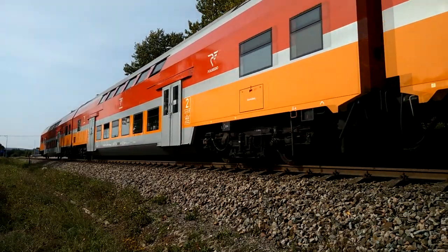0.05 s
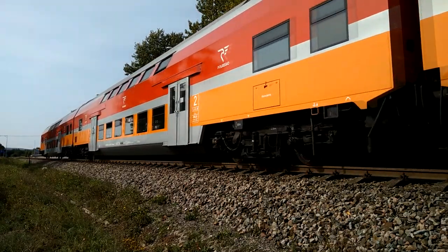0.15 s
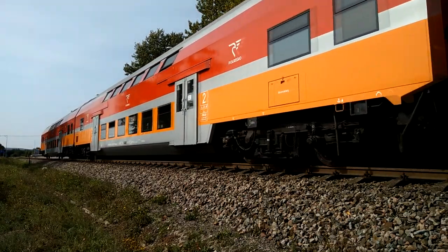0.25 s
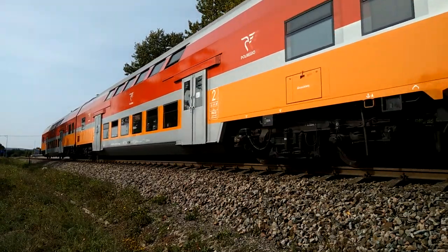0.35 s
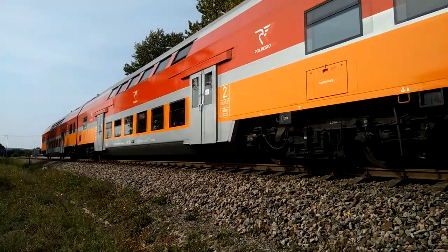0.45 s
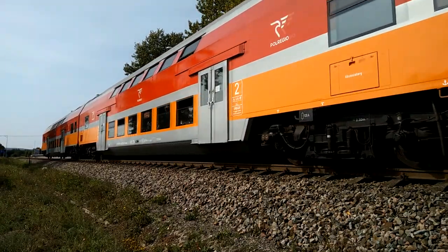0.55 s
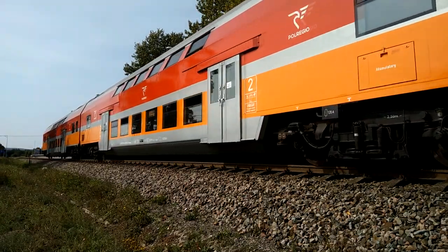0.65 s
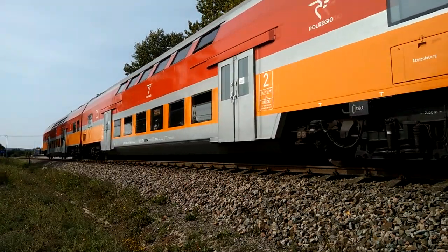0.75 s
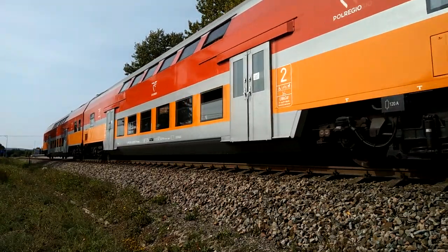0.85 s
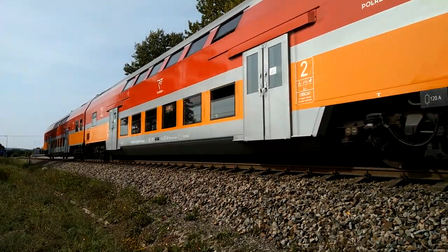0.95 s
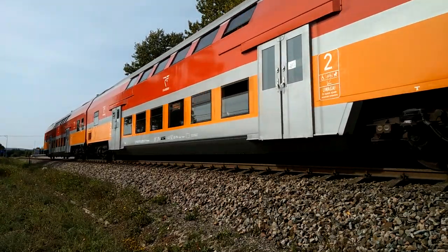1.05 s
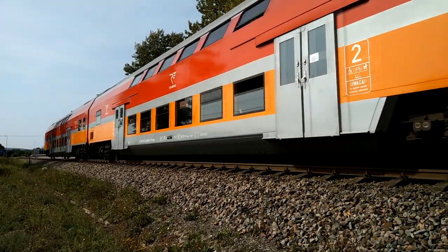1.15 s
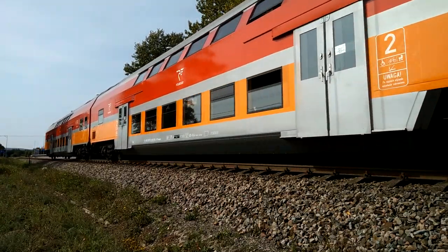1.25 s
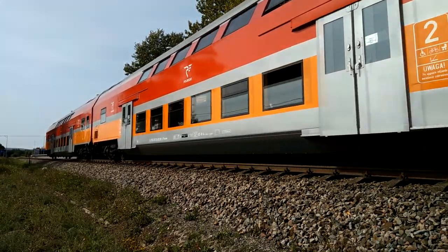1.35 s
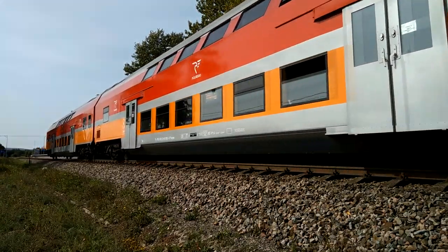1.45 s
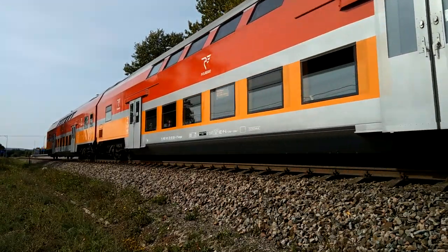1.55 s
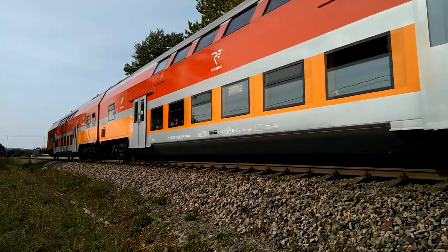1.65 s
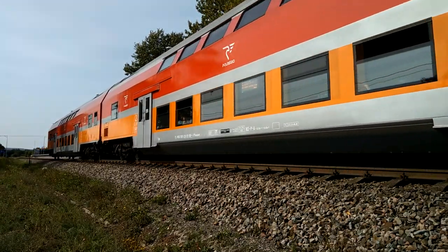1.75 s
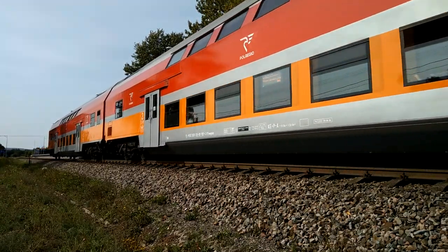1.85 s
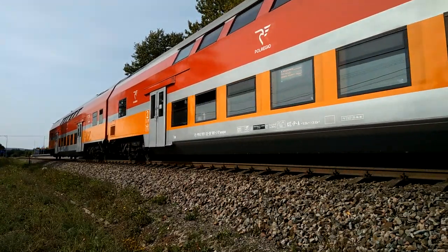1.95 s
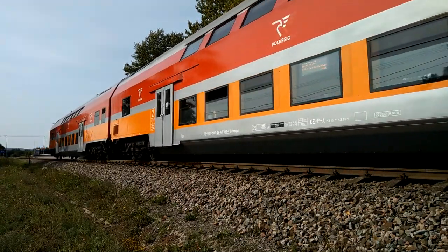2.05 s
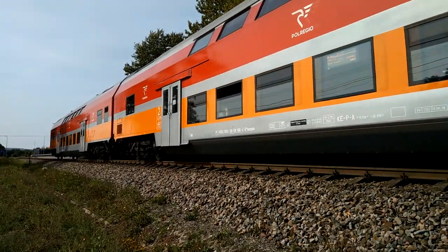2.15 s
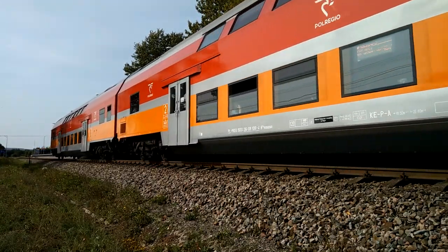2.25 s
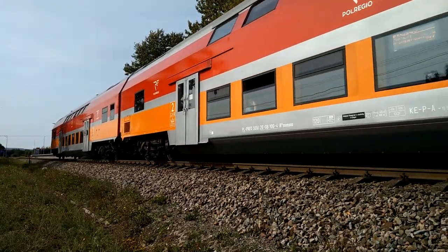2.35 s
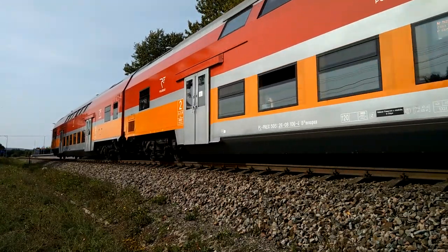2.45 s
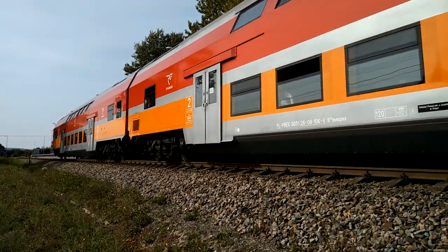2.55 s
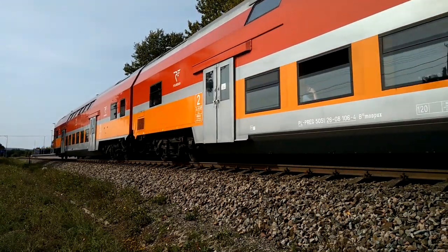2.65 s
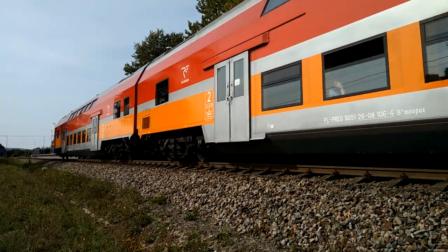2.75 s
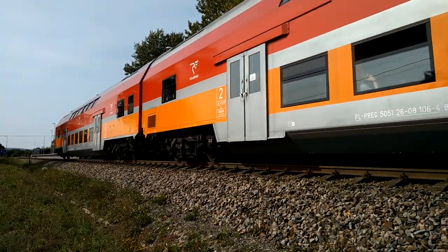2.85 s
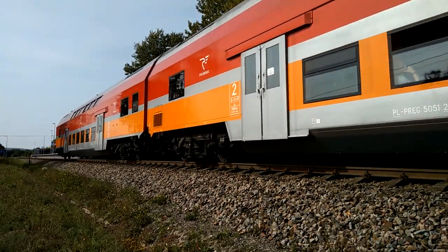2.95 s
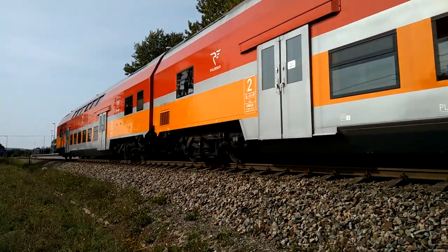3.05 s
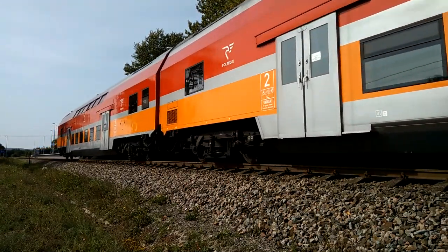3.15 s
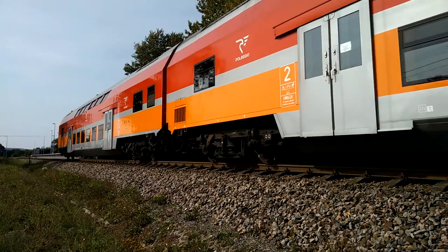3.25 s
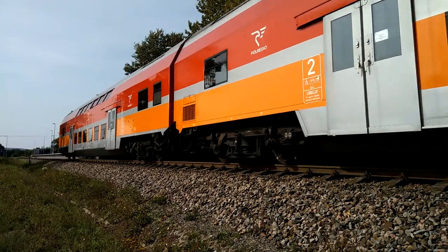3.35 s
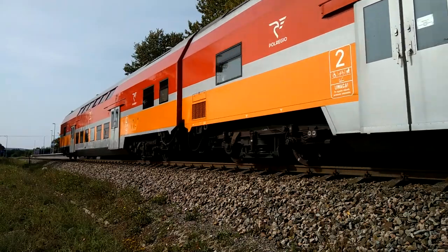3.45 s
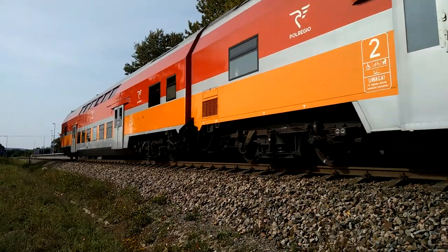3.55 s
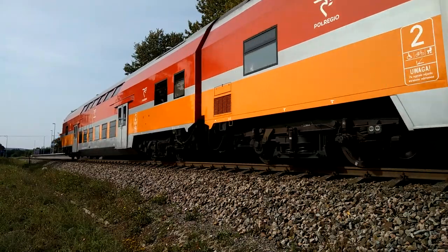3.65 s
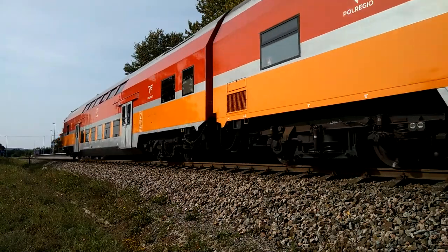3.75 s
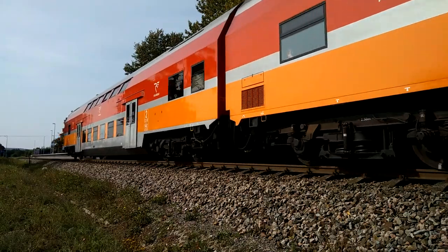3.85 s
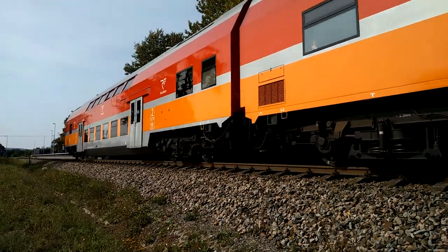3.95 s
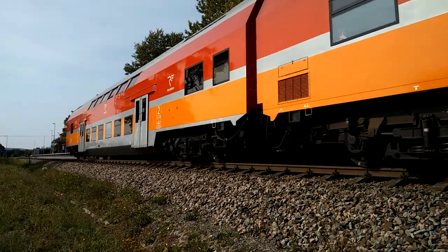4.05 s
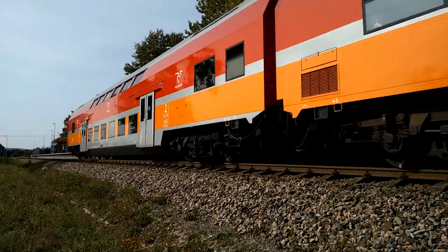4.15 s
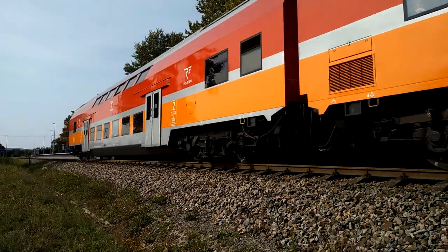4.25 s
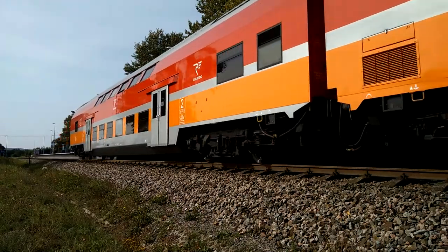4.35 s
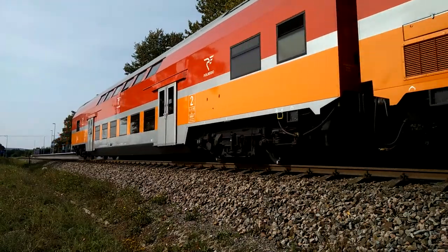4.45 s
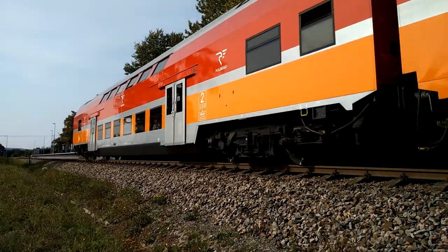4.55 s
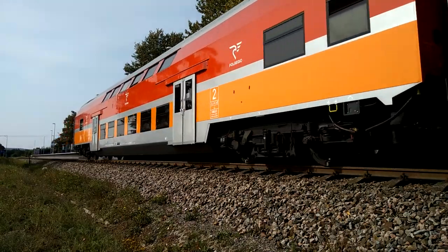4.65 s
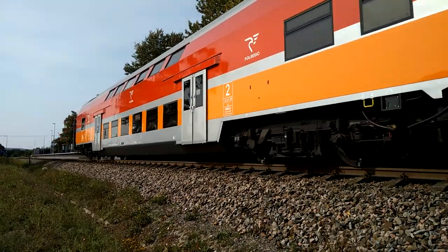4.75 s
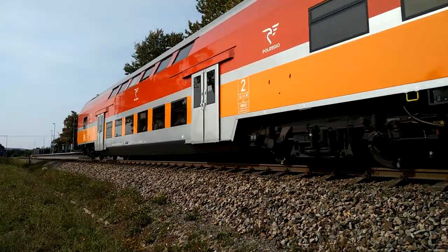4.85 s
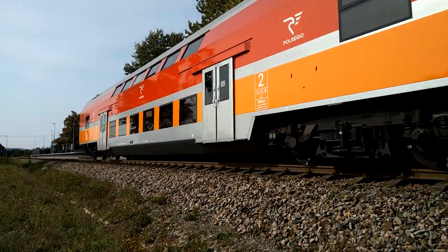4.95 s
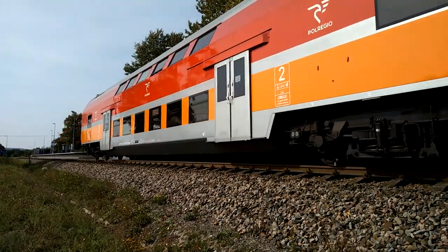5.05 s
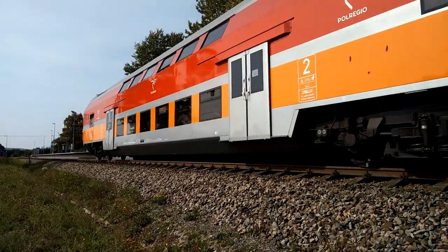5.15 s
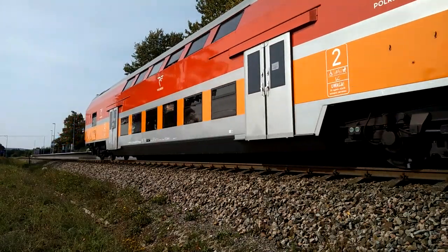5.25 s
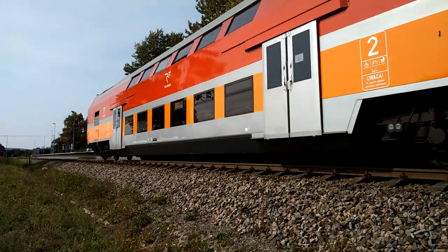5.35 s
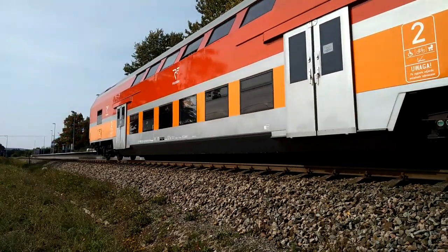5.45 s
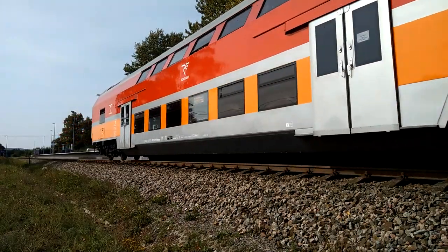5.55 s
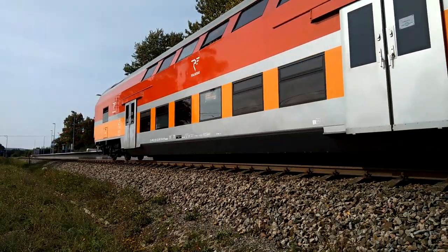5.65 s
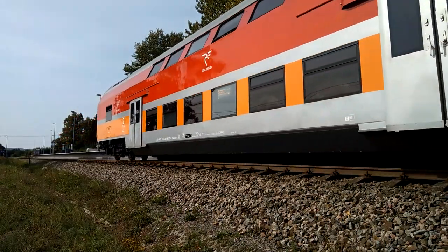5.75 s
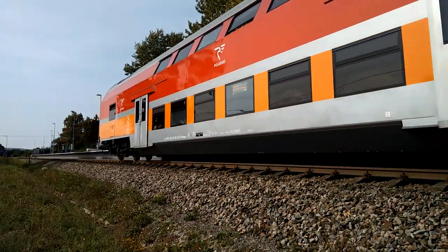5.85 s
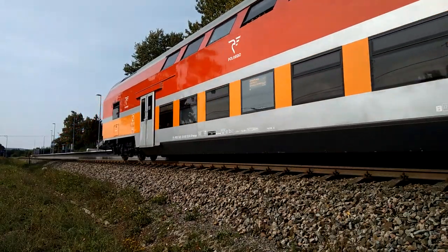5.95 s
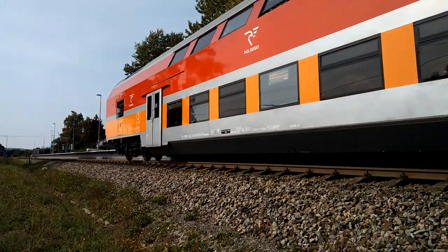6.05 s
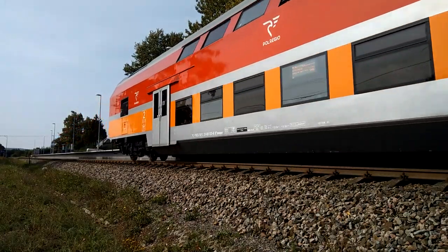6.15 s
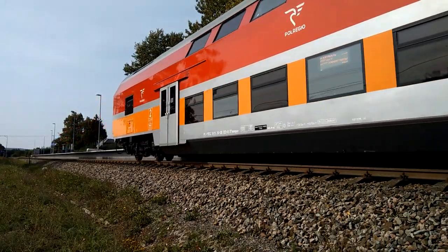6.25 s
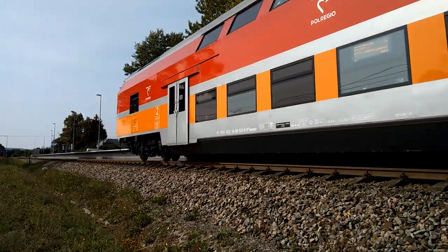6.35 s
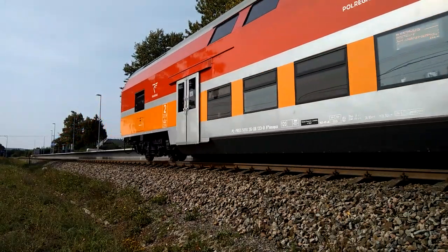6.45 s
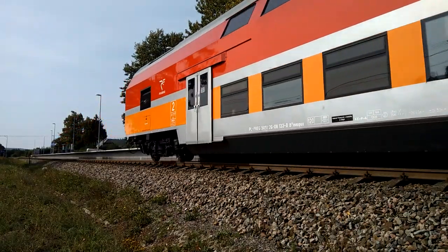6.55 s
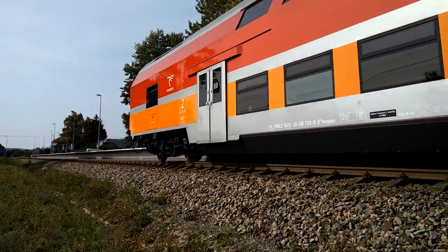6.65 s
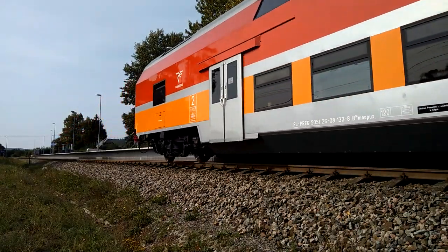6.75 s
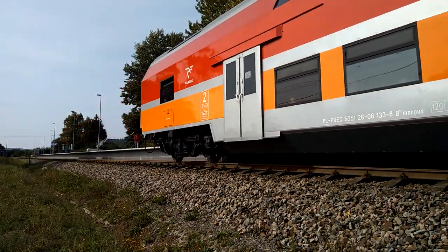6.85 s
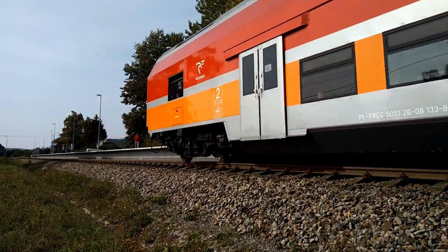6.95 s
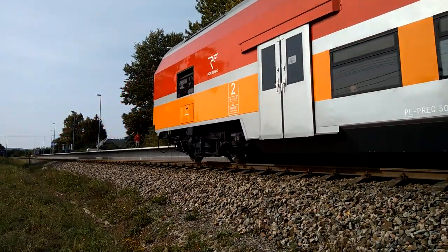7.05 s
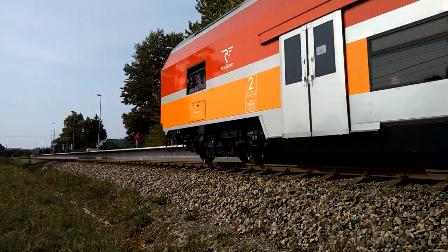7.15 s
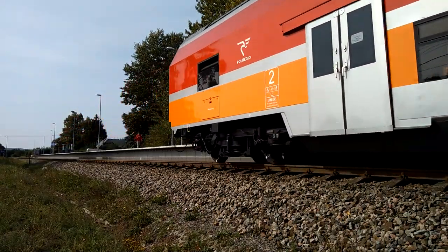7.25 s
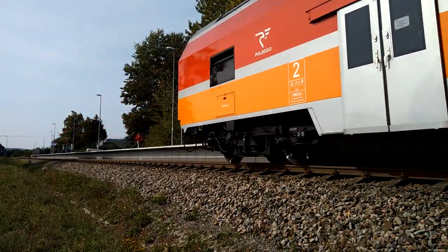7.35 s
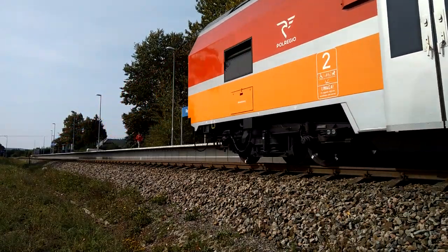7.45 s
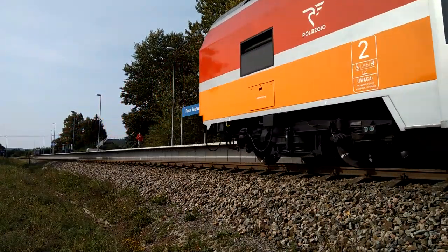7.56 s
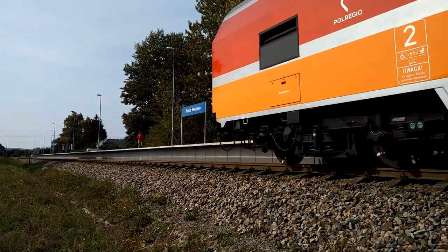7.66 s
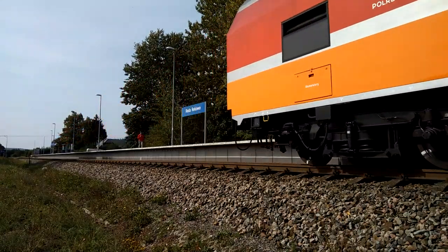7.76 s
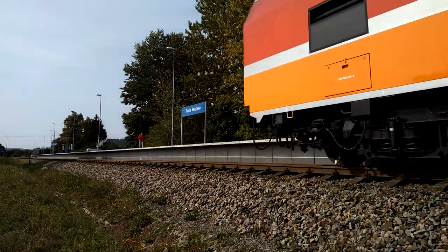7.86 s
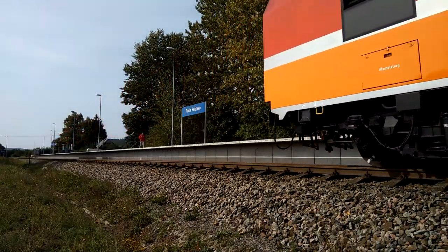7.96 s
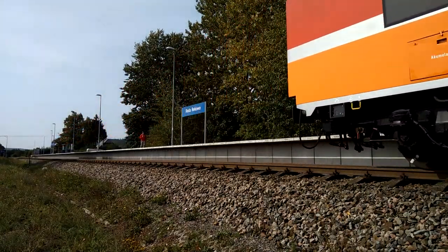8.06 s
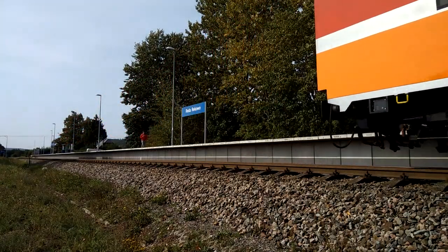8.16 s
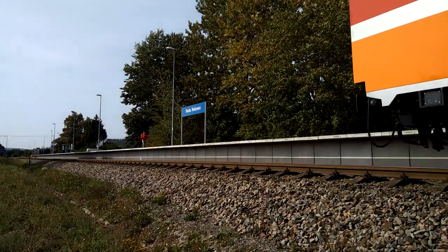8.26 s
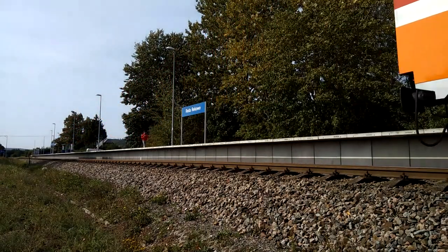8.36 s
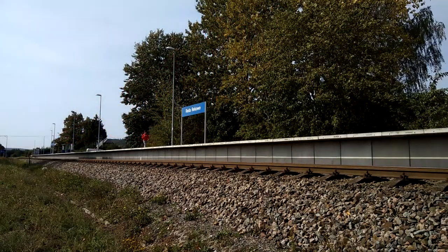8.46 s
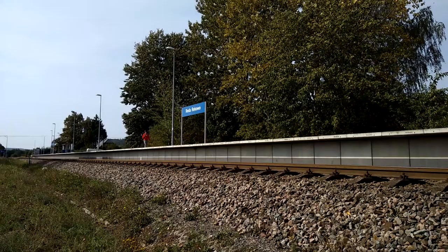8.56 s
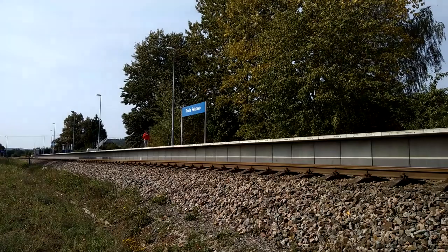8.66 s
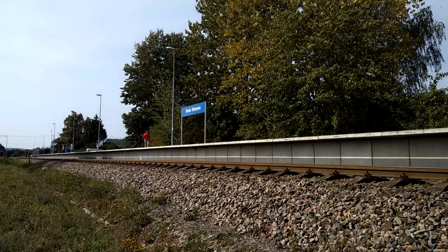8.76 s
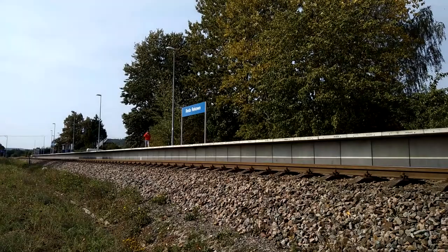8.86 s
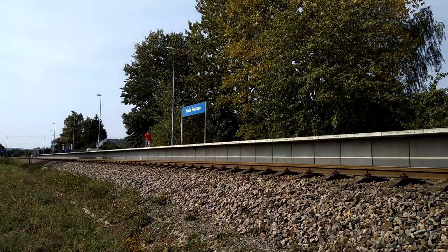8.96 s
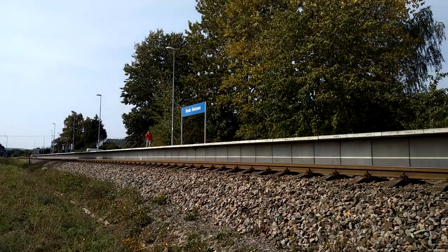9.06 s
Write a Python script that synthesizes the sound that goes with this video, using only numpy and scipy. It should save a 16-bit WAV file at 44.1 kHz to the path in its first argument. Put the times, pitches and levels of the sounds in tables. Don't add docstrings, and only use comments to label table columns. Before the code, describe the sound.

A diesel locomotive's throbbing drone and roar recede to the right while passenger coaches roll past, wheels ringing and knocking on rail joints, a bird chirping late.

```python
import sys
import numpy as np
from scipy import signal
from scipy.fft import next_fast_len
from scipy.io import wavfile
from scipy.ndimage import uniform_filter1d

SR = 44100
rng = np.random.default_rng(int(sys.argv[2]) if len(sys.argv) > 2 else 0)


def wav_out(sig):
    wavfile.write(sys.argv[1], SR, np.round(np.clip(np.atleast_2d(sig).T, -1, 1) * 32767).astype(np.int16))


def gain_from_db(level_db):
    decades = np.asarray(level_db, float) / 20
    return 10 ** decades


N = 401310
T = np.arange(N) / SR
FRAME_S, BIN_HZ = np.arange(N // 256 + 5) * 256 / SR, np.fft.rfftfreq(1024, 1 / SR)


def evened(x):
    return x / np.sqrt(np.mean(abs(x) ** 2) + 1e-20)


def read(points, hz):
    f, value = np.transpose(points)
    return np.interp(np.log(hz + 1), np.log(f + 1), value)


def follow(rows, t):
    s, *columns = np.transpose(rows)
    return [np.interp(t, s, c) for c in columns]


def wander(top_hz, t):
    rates_hz = np.geomspace(top_hz / 20, top_hz, num=12)
    return evened(sum(np.sin(2 * np.pi * (f * t + rng.random())) / np.sqrt(f) for f in rates_hz))


def resonate(x, hz, width_hz):
    turn = np.exp(2j * np.pi * np.cumsum(hz * np.ones(len(x))) / SR)
    r = np.exp(-np.pi * width_hz / SR)
    return 2 * (turn * signal.lfilter([1 - r], [1, -r], x / turn)).real


def steadied(x, share):
    envelope = np.abs(signal.hilbert(x, next_fast_len(len(x)))[:len(x)])
    return evened(x / (envelope + .1) ** share)


def add(mix, s, sound):
    part = mix[:, round(s * SR):][:, :sound.shape[1]]
    part += sound[:, :part.shape[1]]


def ports(sound, lead_ms, pan_db):
    lag = round(abs(lead_ms) * SR / 1000)
    early, late = np.pad(sound, (0, lag)), np.pad(sound, (lag, 0))
    pair = np.array([early, late] if lead_ms > 0 else [late, early])
    return pair * gain_from_db(np.array([[pan_db / 2], [-pan_db / 2]]))


# [f/Hz, left minus right level/dB]
PORT_BALANCE = [(60, 1.2), (300, 1.6), (1200, 1.3), (4000, 1.5), (9500, .5), (11500, 10), (14000, 15)]
# [f/Hz, coherence/1]
PORT_LIKENESS = [(60, .95), (250, .94), (500, .86), (1000, .6), (2200, .5), (4000, .42), (9000, .25)]


def spread_noise(field_db, lead_ms, patchy_db, flicker_db):
    a, b, c, d, patches, streaks = rng.standard_normal((len(FRAME_S), len(BIN_HZ), 6)).T
    streaks = evened(uniform_filter1d(uniform_filter1d(streaks, size=2, axis=0), size=130, axis=1))
    patches = evened(uniform_filter1d(uniform_filter1d(patches, size=8, axis=0), size=20, axis=1))
    flicker = wander(25, FRAME_S)
    flicker = (flicker - uniform_filter1d(flicker, size=36)) * np.clip(BIN_HZ / 3000, 0, 1)[:, None]
    same = np.clip(read(PORT_LIKENESS, BIN_HZ), 0, 1)[:, None]
    left = a + 1j * b
    delay = np.exp(-2j * np.pi * BIN_HZ[:, None] * lead_ms / 1000)
    right = same * delay * left + np.sqrt(1 - same ** 2) * (c + 1j * d)
    balance_db = read(PORT_BALANCE, BIN_HZ)[:, None] * np.array([.5, -.5])[:, None, None]
    texture_db = patchy_db * (.45 * patches + 1.3 * streaks) + flicker_db * flicker
    z = np.array([left, right]) * gain_from_db(field_db + balance_db + texture_db)
    return signal.istft(z, nperseg=1024, noverlap=768)[1][:, 256:N + 256] / np.sqrt(768)


def band_share_db(colour_db, low_hz, high_hz):
    return 10 * np.log10(np.sum(gain_from_db(2 * colour_db[(BIN_HZ > low_hz) & (BIN_HZ < high_hz)])))


# [t/s, level/dB]
SCREEN = [(0, 2.5), (.5, 0), (1.1, 0), (1.6, 0.5), (2.2, -0.5), (3, 0), (3.6, -0.5), (4.2, 0), (5, 0.5),
          (5.6, -1.5), (6.3, -0.5), (6.9, -5), (7.5, -2), (8.3, -0.5), (9.1, -3)]
START_M, TRAIN_M_PER_S = 21.8, 8.8


def locomotive_db(t):
    return follow(SCREEN, t)[0] - 20 * np.log10(1 + TRAIN_M_PER_S * t / START_M)


# [t/s, level/dB]
ROUGH = [
    (.5, 4.5),
    (1.2, -3),
    (2.05, -1.5),
    (3.35, -15),
    (4.65, 1),
    (5.5, 1.5),
    (6.25, -3.5),
    (7.15, -21),
    (8.1, -0.5),
    (8.8, -2.5),
]
ROUGH_S, FAR_WHEELS_DB = 0.3, -18.5


def feed(t, loco_db, loco_steep, wheel_db, wheel_steep):
    near = gain_from_db(2 * FAR_WHEELS_DB) + sum(gain_from_db(2 * db) / (1 + ((t - s) / ROUGH_S) ** 2) for s, db in ROUGH)
    loco_power = gain_from_db(2 * (loco_db + loco_steep * locomotive_db(t)))
    return 10 * np.log10(loco_power + gain_from_db(2 * wheel_db) * near ** wheel_steep)


def slip(turns):
    return rng.random() + turns * np.interp(T, FRAME_S, wander(4, FRAME_S))


# [t/s, cycle rate/Hz]
SPEED = [(0, 8.1), (1.3, 8.155), (1.95, 8.125), (2.6, 8.164), (3.9, 8.212), (5.85, 8.186), (7.15, 8.18),
         (9.1, 8.2)]
STRONG_ORDERS = (8, 9, 12, 16, 23)
SIDE_ORDERS = (7, 11, 13, 18)
WEAK_ORDERS = (4, 5, 6, 10, 14, 15, 17)
# [t/s, peak level/dB, half length/s]
SWELLS = [
    [(.3, -25, .35), (.9, -31, .3), (1.7, -27.5, .35), (2.4, -31, .25), (3.25, -26, .4), (4.05, -30, .5),
     (6.33, -29, .3), (7.25, -34, .35)],
    [(.1, -21, .3), (.6, -15, .25), (1.15, -23.5, .3), (2.15, -30, .25), (2.7, -27, .25), (4.2, -32, .3),
     (5.3, -22.5, .4), (6.2, -27, .35), (8.35, -30.5, .35), (9.1, -32, .3)],
    [(.15, -23, .4), (.9, -21, .22), (1.8, -25, .4), (2.4, -24.5, .3), (3.2, -26.5, .35), (3.95, -27, .35),
     (5.45, -27.5, .6), (6.35, -31, .35), (7.15, -33, .2), (8.4, -34, .3), (9.1, -34, .3)],
    [(.45, -26, .3), (1, -24.5, .22), (1.68, -24, .3), (2.1, -27, .25), (3.1, -25.5, .35), (4.5, -32, .65),
     (6.25, -32, .4), (7.45, -36.5, .4), (8.75, -36, .2)],
    [(.45, -26, .28)],
]
# [t/s, peak level/dB, half length/s]
SIDE_SWELLS = [
    [(.3, -22, .35), (.9, -31, .2), (1.5, -28.5, .3), (2.2, -27, .55), (3.6, -37, .5), (4.8, -29.5, .5),
     (5.85, -33.5, .3), (6.5, -38, .3), (7.6, -34, .3), (8.3, -34, .4), (9, -34, .3)],
    [(.2, -31, .3), (.85, -26, .35), (2.4, -27, .5), (3.3, -31, .3), (4.2, -30, .5), (5, -35, .25),
     (6.3, -37, .5), (7.3, -34.5, .4), (7.8, -37, .2)],
    [(0, -31, .2), (1.7, -29, .4), (2.95, -28, .3), (4.2, -31, .35), (5.9, -34.5, .6), (7.2, -33.5, .3),
     (7.9, -34.5, .4), (8.5, -36, .3)],
    [(.6, -33, .2), (1.6, -32, .45), (3.4, -35, .3), (4.9, -38, .25), (8.6, -43, .3)],
]
# [start level/dB, steepness with distance/1]
WEAK_FADES = [(-37.5, 0.48), (-41, 1.3), (-41, 0.4), (-30.5, 1.2), (-34.5, 1.1), (-35, 1.4), (-41.5, 0.89)]
BETWEEN_SWELLS_DB = -40.5


def exhaust():
    jitter = 1 + 0.00096 * np.interp(T, FRAME_S, wander(3.07, FRAME_S))
    turns = np.cumsum(follow(SPEED, T)[0] * jitter) / SR
    away_db = locomotive_db(FRAME_S)
    gains = []
    for rows in SWELLS + SIDE_SWELLS:
        power = sum(gain_from_db(2 * db) * np.exp(-2 * ((FRAME_S - s) / half_s) ** 2) for s, db, half_s in rows)
        gains.append(gain_from_db(BETWEEN_SWELLS_DB + away_db) + np.sqrt(power))
    for db, steep in WEAK_FADES:
        gains.append(gain_from_db(db + steep * away_db + 2.25 * wander(1.44, FRAME_S)))
    drone = np.zeros(N)
    for order, gain in zip(STRONG_ORDERS + SIDE_ORDERS + WEAK_ORDERS, gains):
        drone += np.sqrt(2) * np.interp(T, FRAME_S, gain) * np.sin(2 * np.pi * (order * turns + slip(0.13)))
    return ports(drone, -0.17, 0.93)[:, :N], turns


# [f/Hz, width/Hz, level/dB]
RUMBLE_BODY = [
    (60.2, 20, -0.5),
    (101, 50.3, -1),
    (134.2, 73, -11),
]
RUMBLE_FEED = (-24.5, 1, -31, 0.2)


def rumble():
    push = rng.standard_normal((2, N))
    push[1] = .85 * push[0] + .53 * push[1]
    body = [sum(gain_from_db(db) * evened(resonate(resonate(p, hz, width_hz), hz, width_hz))
                for hz, width_hz, db in RUMBLE_BODY) for p in push]
    body = signal.sosfilt(signal.butter(4, 48, "high", fs=SR, output="sos"), body)
    return gain_from_db(feed(T, *RUMBLE_FEED) + np.array([[.7], [-.7]])) * evened(body)


# [f/Hz, density/(dB per Hz)]
ROAR_COLOUR = [(24, -39), (40, 0.5), (89, 1), (140, -10.5), (165, -16), (207, -13.5), (281, -15.5),
               (442, -15.5), (577, -19.5), (924, -20), (1540, -25.5), (3040, -35.5), (4220, -41),
               (5400, -47.5), (7020, -106), (11900, -120)]
ROAR_FEED = (-17.5, 1.37, -47.5, -3)
DULL_DB_PER_OCTAVE, HIDDEN_S, HIDING_S = 6, 7.12, 0.66


def roar(turns):
    treble_db = .6 - DULL_DB_PER_OCTAVE * (1 + np.tanh((FRAME_S - HIDDEN_S) / HIDING_S))
    colour_db = read(ROAR_COLOUR, BIN_HZ)
    field_db = (colour_db - band_share_db(colour_db, 20, 16000))[:, None] + feed(FRAME_S, *ROAR_FEED)
    field_db += treble_db * np.log2(1 + BIN_HZ / 400)[:, None]
    puffs = 1 + 0.019 * np.cos(2 * np.pi * turns) + 0.091 * np.cos(2 * np.pi * 4 * turns)
    noise = 33 * spread_noise(field_db, -0.27, patchy_db=0.4, flicker_db=1.3)
    return puffs * signal.sosfilt(signal.butter(4, 110, "high", fs=SR, output="sos"), noise)


# [f/Hz, density/(dB per Hz)]
ROLL_COLOUR = [(88, -34), (150, -4), (254, -8), (342, -15.5), (442, -15), (553, -17.5), (662, -20),
               (804, -19.5), (1320, -19.5), (1580, -19), (1830, -23), (2230, -22), (3300, -29), (4000, -29),
               (4790, -34), (5400, -41.5), (7020, -81), (11900, -120)]
ROLL_BANDS_HZ = [260, 700, 2600]
DRUM_FEED, RING_FEED, HISS_FEED = (-26, 1.32, -38, 1.1), (-29.5, 0.82, -41.5, 0), (-43.5, 1, -39.5, 0.61)
WHEELS_LEAD_MS, LEAD_MS_PER_S = 0.3, 0.011


def rolling():
    colour_db = read(ROLL_COLOUR, BIN_HZ)
    edges_hz = [(150, 400), (400, 1200), (1400, 5000)]
    feeds = (DRUM_FEED, RING_FEED, HISS_FEED)
    gains_db = np.array([feed(FRAME_S, *layer) - band_share_db(colour_db, *edge)
                         for layer, edge in zip(feeds, edges_hz)])
    parts = np.arange(len(edges_hz))
    place = np.interp(np.log(BIN_HZ + 1), np.log(ROLL_BANDS_HZ), parts)
    weights = np.clip(1 - abs(place[:, None] - parts), 0, 1)
    field_db = colour_db[:, None] + weights @ gains_db
    lead_ms = WHEELS_LEAD_MS + LEAD_MS_PER_S * FRAME_S
    return 33 * spread_noise(field_db, lead_ms, patchy_db=1.33, flicker_db=1.7)


# [f/Hz, density/(dB per Hz)]
FIZZ_COLOUR = [(3120, -14), (5300, -7), (5490, -0.5), (5850, 2), (6280, -3.5), (6870, -2), (7900, -5),
               (10800, -6.5), (11600, -6.5), (13000, -6), (14200, -10), (15500, -11)]
FIZZ_FEED = (-51, 2, -58, 0.5)
JOLT_DB, JOLT_S = 39, .03


def fizz():
    colour_db = read(FIZZ_COLOUR, BIN_HZ)
    field_db = (colour_db - band_share_db(colour_db, 9000, 14000))[:, None] + feed(FRAME_S, *FIZZ_FEED)
    jolts = sum(gain_from_db(db + JOLT_DB) * np.exp(-abs(FRAME_S - s) / JOLT_S)
                for s, db, hz, _ in SQUEAKS if hz > 9000)
    field_db += np.clip(BIN_HZ / 12000, 0, 1)[:, None] ** 2 * 20 * np.log10(1 + jolts)
    field_db += 1.1 * wander(20, FRAME_S)
    return 33 * spread_noise(field_db, .3, patchy_db=1, flicker_db=.6)


LOCO_TONES_HZ, LOCO_TONES_S, LOW_TONES_HZ = 400, 3, 900


def tone_lead_ms(s, hz):
    if hz < LOCO_TONES_HZ and s < LOCO_TONES_S:
        return -.22
    return .2 if hz < LOW_TONES_HZ else WHEELS_LEAD_MS + LEAD_MS_PER_S * s


# [f/Hz, width/Hz, level/dB]
RAIL = [
    (463, 14, -43.5),
    (725, 14, -52),
    (804, 10, -52),
]
# [t/s, length/s,
# f/Hz, level/dB]
HUMS = [(0, 0.12, 331, -31), (0, 0.85, 240.4, -30.5), (0.898, 0.79, 237.4, -31), (0, 0.89, 354, -36),
        (0, 0.92, 519.6, -39), (0, 0.48, 870, -41), (.75, 2.4, 726, -41), (.95, .6, 2210, -51),
        (1, 2.1, 3340, -64), (1.244, 0.71, 503, -40), (.9, 0.51, 338, -36.5), (1.3, 2.34, 303, -40),
        (1.545, 0.96, 337.4, -35), (1.65, 2.8, 815, -48.5), (2.2, 0.79, 204.3, -36), (2.2, 1.1, 178.5, -37),
        (2.705, 0.49, 324, -40), (3.19, 1.07, 464.7, -38.5), (3.9, 1.5, 3900, -59), (4, 1.2, 12800, -66),
        (3.95, 0.99, 494, -44), (3.95, 0.76, 714, -46), (4.35, 0.58, 220, -40.5), (4.3, 1.2, 2664, -54),
        (4.5, 0.32, 2750, -54), (5.05, .35, 3360, -56), (7.9, 0.39, 3380, -55), (4.8, .4, 1670, -53),
        (4.845, .75, 724, -40), (4.847, .8, 802, -43), (5.9, 0.48, 3620, -55), (5.95, 0.26, 2610, -51),
        (6, 0.39, 2890, -55), (6.252, 0.37, 792, -47.5), (6.75, 1.07, 431.6, -44), (6.85, 0.84, 201, -41.5),
        (6.943, 0.88, 805, -47), (7.25, 0.69, 2250, -61), (7.3, 1.6, 2950, -55.5), (7.45, 0.54, 1080, -55),
        (7.704, 0.68, 421, -43), (8.1, 0.82, 940, -52), (8.256, 0.37, 483, -47), (7.9, 1.5, 255.4, -43),
        (8.3, 0.57, 278, -45), (8.6, .12, 2030, -55), (8.17, .09, 1550, -50), (8.33, .45, 1690, -45),
        (8.61, 0.075, 2430, -47), (8.99, 0.14, 2020, -46), (9, 0.093, 2580, -51), (8.35, 0.47, 2290, -55),
        (.8, 0.42, 724, -39.5), (1.4, 0.31, 151, -32), (1.952, 0.33, 746, -45), (2.05, .35, 810, -45),
           (2.38, 0.28, 462, -37), (3.018, 0.33, 800, -43.5), (3.002, 0.33, 152.4, -32.5),
           (4.02, .4, 464, -40.5), (5.17, .35, 1010, -47), (5.98, 0.35, 465, -48), (6.32, 0.29, 484, -45),
           (7.9, 0.31, 249, -41), (8.83, 0.25, 262.5, -41), (0, .2, 2320, -43), (4.1, .26, 3391, -52),
           (5.382, 0.25, 2615, -49), (8.5, .2, 3773, -60), (0.897, .5, 468.4, -35.5), (1.6, .5, 463, -37.5),
           (3.5, 0.39, 207, -38), (4.747, .4, 204.5, -38.5), (5.2, 0.68, 233, -41),
           (6.453, 0.26, 240.2, -42), (8.02, .2, 2200, -53), (8.36, .12, 2650, -50), (8.72, .12, 2130, -50),
           (7.55, .35, 960, -46), (5.9, .3, 620, -46), (4.75, .3, 640, -45), (3.45, .3, 300, -39),
           (1, .25, 290, -33), (3.6, .3, 147, -35), (2.1, .3, 190, -35), (8.62, .08, 2070, -49),
           (4.66, .07, 1560, -45), (4.68, .12, 2100, -49), (5.2, .1, 2120, -50), (5.75, .25, 2150, -51),
           (5.6, .3, 1620, -51), (6.07, .07, 1700, -48), (8.2, .2, 2850, -53), (8.8, .15, 1690, -50),
           (6.05, .3, 200, -39), (4.95, .09, 1680, -47)]
# [t/s, length/s, f/Hz, end f/Hz, level/dB]
GLIDES = [
    (0, 2.8, 4050, 4450, -56),
    (.7, 2.8, 345, 318, -40),
    (1.8, 7.6, 200, 257, -43),
]
# [t/s, length/s, f/Hz, end f/Hz, width/Hz, level/dB]
CLATTER = (.065, .075, 2500, 2700, 1600, -34.5)
HUM_WIDTH, HUM_WIDEST_HZ, HUM_SAG = 0.01, 13, 0.993
HUM_STEADY = .45
GLIDE_WIDTH_HZ, GLIDE_WIDTH = 3.8, 0.0049


def rail_tones():
    out = np.zeros((2, N))
    fade = gain_from_db(feed(T, *RING_FEED) + 36)
    for hz, width_hz, db in RAIL:
        ring = steadied(evened(resonate(rng.standard_normal(N), hz, width_hz)), HUM_STEADY)
        add(out, 0, ports(gain_from_db(db) * fade * ring, .2, 1.5))
    songs = [(s, length_s, hz, hz * HUM_SAG, min(3 + hz * HUM_WIDTH, HUM_WIDEST_HZ), db)
             for s, length_s, hz, db in HUMS]
    songs += [CLATTER]
    songs += [(s, length_s, hz, end_hz, GLIDE_WIDTH_HZ + hz * GLIDE_WIDTH, db)
              for s, length_s, hz, end_hz, db in GLIDES]
    roughness = rng.standard_normal(2 * N)
    for s, length_s, hz, end_hz, width_hz, db in songs:
        count = int(length_s * SR)
        push = roughness[round(s * SR):][:count]
        hum = evened(resonate(push, np.linspace(hz, end_hz, count), width_hz))
        hum = steadied(hum, HUM_STEADY * (width_hz < 100))
        hum = gain_from_db(db) * hum * signal.windows.tukey(count, .6)
        add(out, s, ports(hum, tone_lead_ms(s, hz), read(PORT_BALANCE, hz)))
    return out


# [t/s, peak level/dB, settled f/Hz, first pitch above it/1, t60/s]
KNOCKS = [(.024, -21, 330, .3, .05), (.036, -25, 760, .2, .03), (.079, -25, 780, .2, .03),
          (1.122, -27, 480, .2, .04), (1.452, -24, 420, .3, .05), (2.51, -29, 470, .1, .05),
          (7.9, -33, 450, .1, .06), (2.385, -22, 250, .5, .06), (2.96, -25, 210, .2, .06),
          (3.2032, -20, 900, .3, .02), (3.2041, -8.5, 480, .9, .03), (3.2115, -26, 400, .1, .09),
          (3.645, -20.5, 510, .3, .085), (5.65, -24.5, 540, .1, .04), (5.7435, -16.5, 660, .6, .024),
          (5.753, -27, 260, .3, .05), (5.773, -24, 760, .05, .03), (5.795, -31, 620, .1, .06),
          (6.19, -26, 440, .4, .04), (7.7665, -26, 480, .05, .07), (8.117, -27.5, 440, .3, .08),
          (8.134, -27, 450, .2, .07)]


def knocks():
    out, t = np.zeros((2, N)), np.arange(3000) / SR
    # delay/s, level/dB, share of the pitch drop
    echoes = [(0, 4.5, 1), (.014, -7.5, 1.1), (.019, -9, .3), (.027, -9.5, .45), (.047, -11, .6)]
    for s, db, hz, sweep, t60_s in KNOCKS:
        for delay_s, echo_db, bright in echoes:
            phase = 2 * np.pi * np.cumsum(hz * (1 + bright * sweep * np.exp(-t / .003))) / SR
            ring = gain_from_db(db - 60 * t / t60_s) * np.minimum(t / .002, 1) ** 2 * np.sin(phase)
            add(out, s + delay_s, ports(gain_from_db(echo_db) * ring, 0.33, 1.6))
    return out


def scattered_notes(notes, peak):
    out, lag_s = np.zeros((2, N)), np.arange(5000) / SR
    hits = (rng.random(len(lag_s)) < 1600 / SR) * rng.standard_normal(len(lag_s))
    scatter = hits * gain_from_db(-25 - 60 * lag_s / .3) * (lag_s > .008)
    scatter[0] = gain_from_db(-1)
    for s, db, hz, length_s, pan_db in notes:
        count = int(length_s * SR)
        phase = 2 * np.pi * np.cumsum(np.linspace(hz * 1.006, hz * .994, count)) / SR
        swell = np.sin(np.pi / 2 * np.interp(np.linspace(0, 1, count), [0, peak, 1], [0, 1, 0])) ** 2
        note = gain_from_db(db) * swell * (np.sin(phase) + gain_from_db(-26) * (hz < 6000) * np.sin(2 * phase))
        add(out, s, ports(signal.fftconvolve(note, scatter), -.015 * pan_db, pan_db))
    return out


# [t/s, peak level/dB, f/Hz, length/s]
SQUEAKS = [(1.863, -37, 3100, .014), (3.21, -47, 14330, 0.042), (3.368, -39, 3510, 0.02),
           (5.756, -43, 13700, .01), (5.767, -39, 13300, .008), (5.752, -53, 14600, .012),
           (5.754, -51, 10300, .012), (6.024, -53, 15300, 0.018), (6.028, -55, 10500, .016),
           (6.029, -52, 5270, .016), (6.244, -37, 5150, 0.01), (6.246, -46, 4500, .006),
           (6.492, -64, 14000, .016)]


def squeaks():
    return scattered_notes([(*row, read(PORT_BALANCE, row[2])) for row in SQUEAKS], peak=.47)


# [t/s, peak level/dB, f/Hz, length/s, left minus right level/dB]
BIRD = [(6.608, -48, 3980, .03, 0), (6.661, -34, 3910, 0.052, 2.5), (6.85, -30, 3940, 0.034, 0.5),
        (7.192, -45, 3920, .014, 2), (7.199, -24.5, 3890, 0.015, -3), (7.21, -24, 3840, 0.0079, -3),
        (7.217, -40, 4070, 0.0098, -1), (7.216, -39, 4420, .008, -1), (7.225, -41, 3900, .014, -3),
        (7.274, -46, 3600, .016, 0), (6.884, -46, 3940, .022, -2), (6.912, -45, 3900, .024, 0),
        (6.71, -45, 3900, .02, 0)]


def bird():
    return scattered_notes(BIRD, peak=.5)


def scene():
    drone, turns = exhaust()
    train = drone + rumble() + roar(turns) + rolling() + fizz() + rail_tones() + knocks()
    return train + squeaks() + bird()


def top_cut(x):
    return signal.sosfilt(signal.butter(12, 15630, fs=SR, output="sos"), x)


# [f/Hz, level/dB]
SPARSE = [(4100, -30), (4800, -11), (5250, 1.5), (5500, 5), (6300, 5.5), (6800, 3.5), (8000, 3.2),
          (10800, 3.6), (11600, -1), (13500, 0), (15000, 2)]
# [f/Hz, level/dB]
STARVED = [(2500, 0), (3300, 17), (4100, 22), (4800, 9), (5250, 1), (5500, 0)]
# [f/Hz, deviations/1]
DROPS = [(1500, 3), (3000, 2.1), (4000, 1.5), (4700, 1.1), (5400, 1.3), (9000, 1.9), (15000, 2.2)]
OPEN_UNTIL_S, OPEN_HZ = 3.2, 15650
EDGE_HZ, AJAR_HZ, AJAR_ABOVE = 14280, 15000, .85


def record(dry):
    hz, t, z = signal.stft(dry, SR, window="cosine", nperseg=2048)
    local = np.sqrt(uniform_filter1d(uniform_filter1d(abs(z) ** 2, size=24, axis=1), size=3, axis=2))
    whim_db = 1.7 * np.repeat(rng.standard_normal((len(t), len(hz) // 12 + 1)), 12, axis=1)[:, :len(hz)].T
    need_db = read(SPARSE, hz)[:, None] + whim_db + np.outer(read(STARVED, hz), t < OPEN_UNTIL_S)
    z = z * (abs(z) > local * gain_from_db(need_db))
    luck = np.repeat(rng.standard_normal((len(t), len(hz) // 5 + 1)), 5, axis=1)[:, :len(hz)].T
    luck = evened(uniform_filter1d(luck, size=3, axis=1))
    z = z * (luck > -read(DROPS, hz)[:, None] - .9 * (t > OPEN_UNTIL_S))
    chance = evened(uniform_filter1d(rng.standard_normal(len(t)), size=3))
    edge_hz = np.where(chance > AJAR_ABOVE, AJAR_HZ, EDGE_HZ)
    edge_hz[t < OPEN_UNTIL_S] = OPEN_HZ
    for s, _, squeak_hz, length_s in SQUEAKS:
        edge_hz[(abs(t - s - length_s / 2) < .03) & (squeak_hz > EDGE_HZ)] = OPEN_HZ
    kept = signal.istft(z * (hz[:, None] < edge_hz), SR, window="cosine", nperseg=2048)[1][:, :N]
    kept = kept * np.clip(.5 + T / .03, 0, 1)
    return top_cut(kept)


dry = scene()
out = record(dry)
wav_out(out)
```